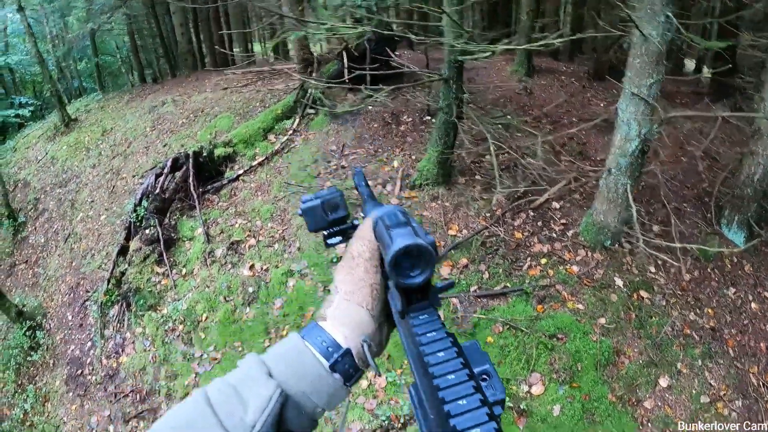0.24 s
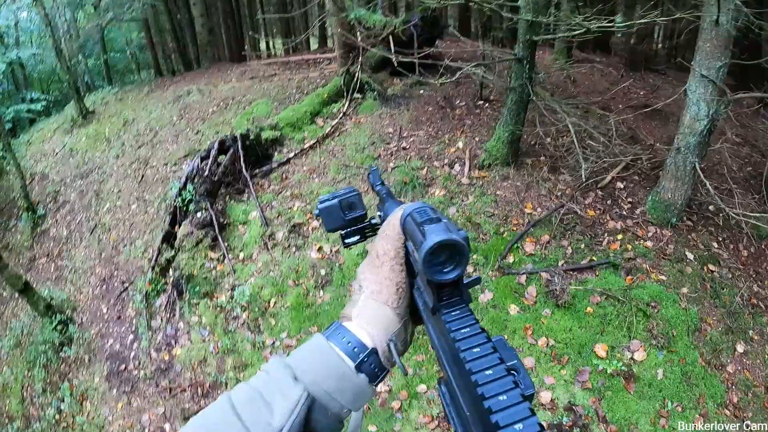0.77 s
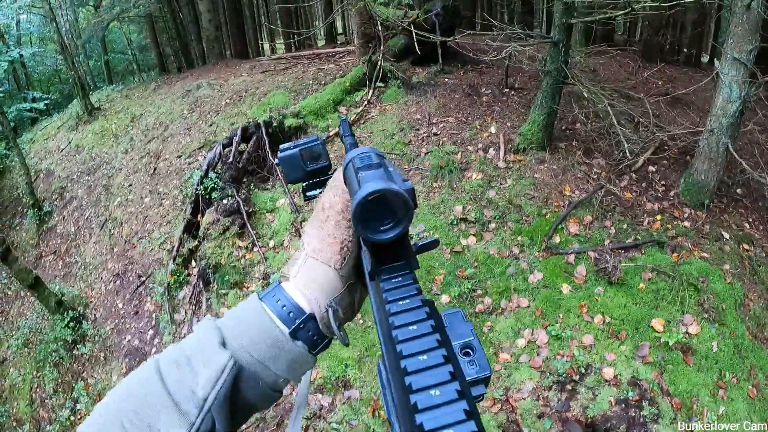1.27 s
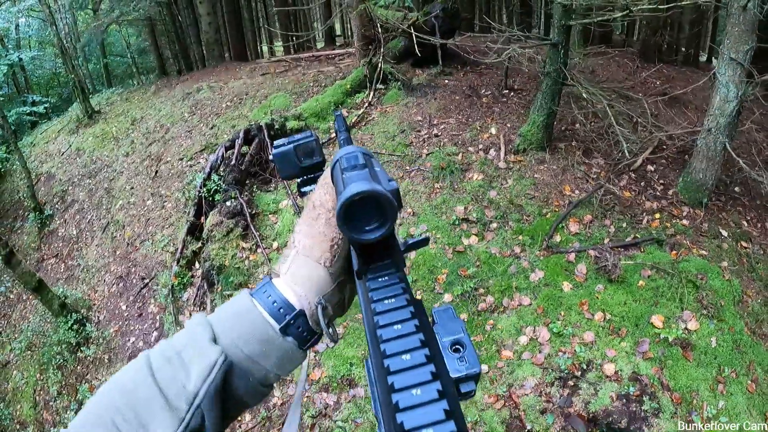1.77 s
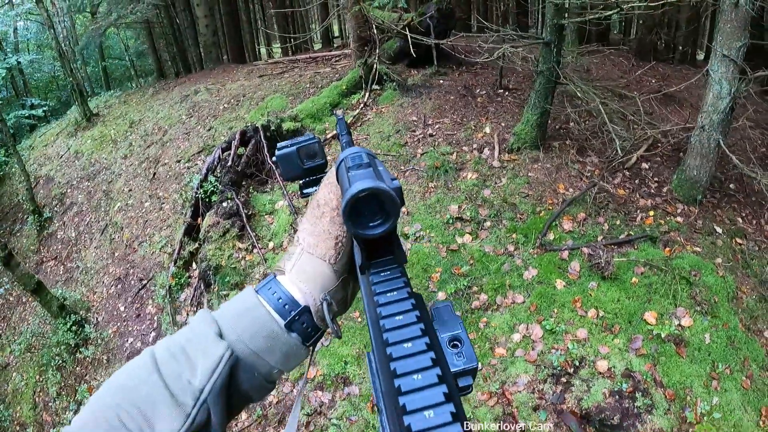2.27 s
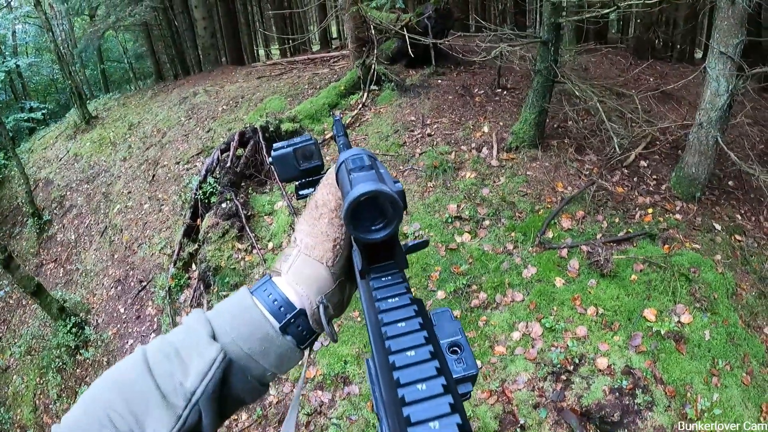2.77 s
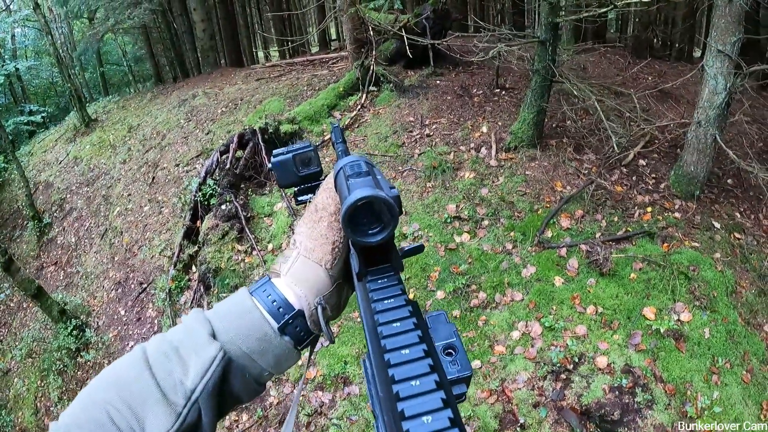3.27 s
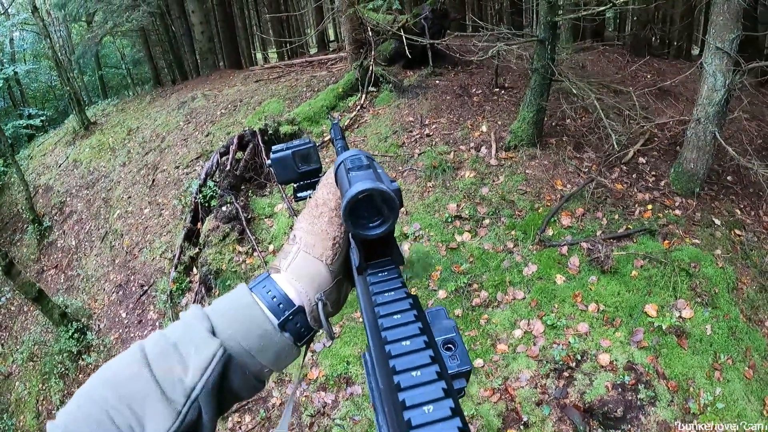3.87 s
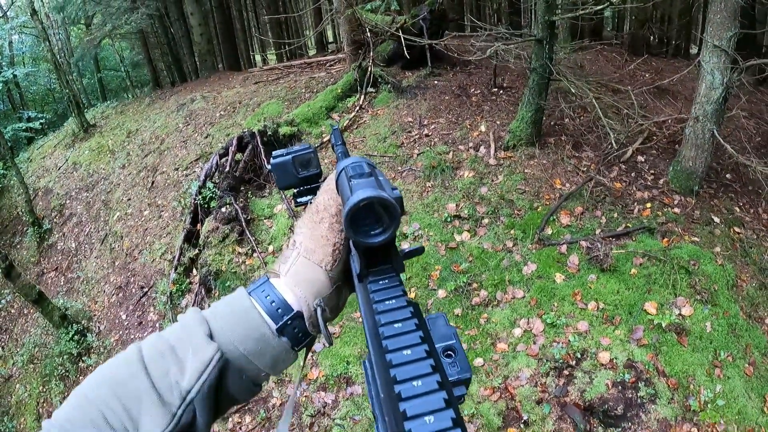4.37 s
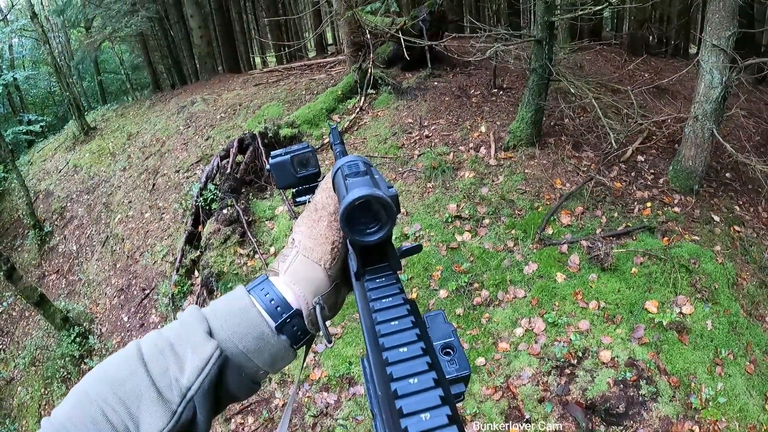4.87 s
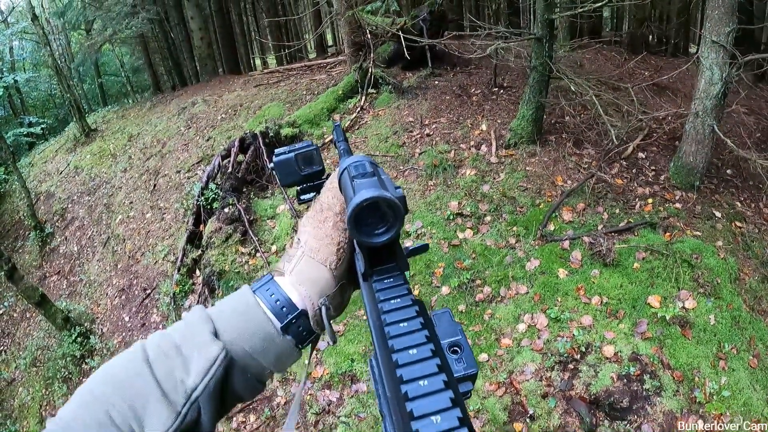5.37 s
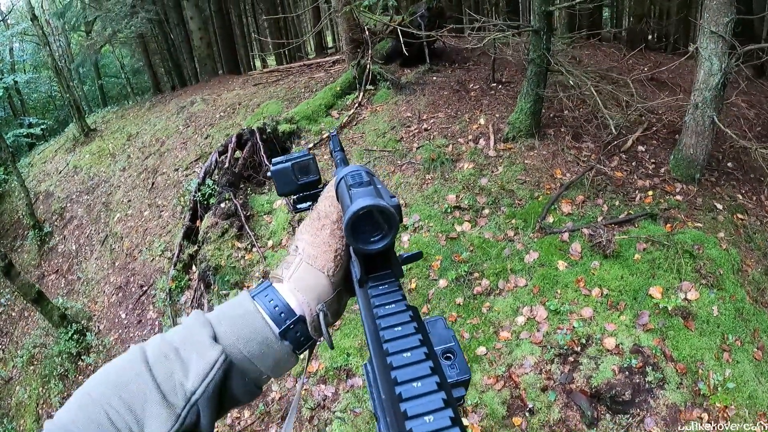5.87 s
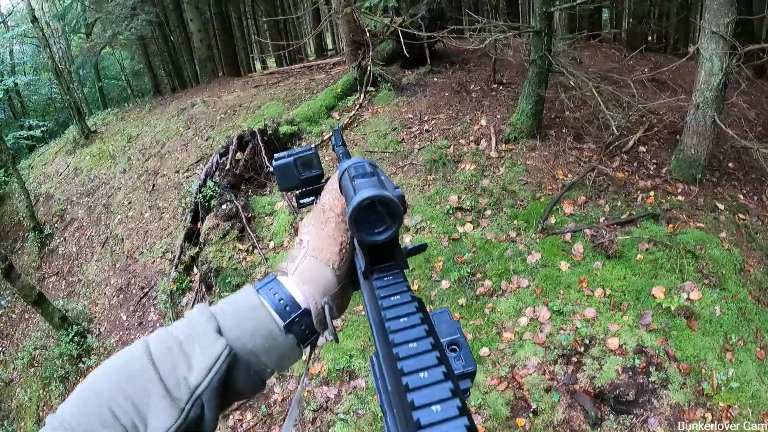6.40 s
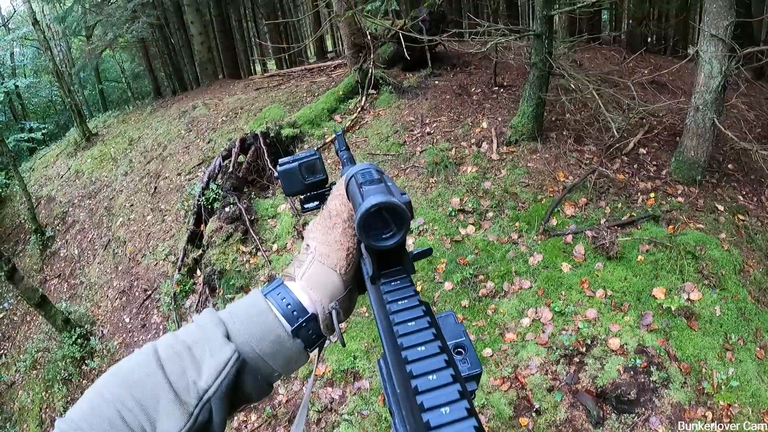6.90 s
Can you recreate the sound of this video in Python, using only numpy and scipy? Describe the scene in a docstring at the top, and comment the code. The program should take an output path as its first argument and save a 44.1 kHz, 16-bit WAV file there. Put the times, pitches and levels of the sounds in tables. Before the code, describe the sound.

A very close, dry and loud gas airsoft rifle in a forest, heard by a camera on the shooter's body. At 0 seconds the bolt slams shut, and at 0.1 a single shot cracks out. Its echo scatters from the trunks and dies within a second, treble first, while cloth rustles, strongest around 1 second, with small handling ticks near 0.4 and 1.6. Automatic fire runs from 1.8 to 3.2, eight shots at about five per second. After a pause with a brief sleeve brush at 3.6, five shots come from 3.8 to 4.6, three from 5.2 to 5.6 and four from 6.2 to 6.8. Each shot is a short falling pop, a bright metallic crack, then a closing slam with rattle and ringing; shots after rests are slightly louder. A far engine's low thuds and a hollow airy drone fade behind; a soft gust rumbles at 7.

```python
"""A gas airsoft rifle fires short automatic bursts in a forest, an arm's length from a body camera.
In each shot shaped noise rings the parts: the action knocks, the bolt cracks against its rear stop and slams home.
A falling tone makes the gas pop at the muzzle, fading sine waves make the frame ring, and trunks echo it all.
Behind lie the thuds of a far idling engine and, from filtered noise, a hollow drone, a rustling sleeve and a breeze."""
import sys
import numpy as np
from scipy import signal
from scipy.fft import rfft, irfft, next_fast_len
from scipy.io import wavfile
from scipy.ndimage import uniform_filter1d

SR = 44100
rng = np.random.default_rng(int(sys.argv[2]) if len(sys.argv) > 2 else 0)


def log_audio(samples):
    """Write samples as a 16-bit WAV file to the path given in sys.argv[1]."""
    # one column per channel
    frames = np.atleast_2d(samples).T
    # limit to full scale, then quantise
    limited = np.clip(frames, -1, 1)
    pcm = np.round(limited * 32767).astype(np.int16)
    wavfile.write(sys.argv[1], SR, pcm)


N = 314874

# shots: (muzzle pop time [s], relative level of the thump through the shooter's body [dB])
SHOTS = [(0.1314, -35), (1.815, -30), (2.0179, -23.5), (2.2039, -26), (2.397, -29), (2.5956, -40),
         (2.7985, -39), (2.997, -33.5), (3.2018, -35), (3.8276, -37.5), (4.0092, -33), (4.206, -28.5),
         (4.397, -34.5), (4.5988, -27.5), (5.2137, -30), (5.4071, -37), (5.6076, -34), (6.207, -30.5),
         (6.4003, -25.5), (6.6003, -30), (6.8064, -31.5)]
# a bolt closing just as the scene opens: (time [s], relative level [dB])
OPENING_BOLT = [(-.001, -1.5)]
# small parts touching around the pop:
# (time after pop [ms], relative level [dB], rise [ms], fall [ms], resonance [Hz], width [Hz])
FIRING_CONTACTS = [(-21.5, -27, 0.28, 1.1, 6300, 1600), (-15.5, -16.5, 1.4, 7.2, 718, 250),
                   (-14.5, -19, 3.35, 4.7, 1100, 370), (-10.5, -14.5, 0.63, 1.8, 4700, 420),
                   (-7.5, -25, 7.8, 9.4, 2090, 270), (-3, -19, 2.4, 1.2, 6300, 1500),
                   (14.5, -28.5, 0.59, 5.9, 690, 380), (27, -28, 0.67, 5.3, 1380, 210)]
# small parts touching as the bolt seats:
# (time after it is home [ms], relative level [dB], rise [ms], fall [ms], resonance [Hz], width [Hz])
SEATING_CONTACTS = [(-11, -28.5, 1.8, 3.7, 1050, 320), (-7.5, -30, 6.5, 2.9, 3300, 350),
                    (-1, -12.5, 1.4, 3.2, 1021, 185), (5, -38.5, 0.75, 2.4, 576, 100),
                    (17, -37.5, 7.6, 25, 1010, 300), (30, -31, 1.3, 6.8, 1150, 450),
                    (40, -33.5, 0.87, 2.5, 3300, 700)]
# the bolt sliding and chattering in its rails: (time after pop [ms], relative level [dB], rise [ms], fall [ms])
SLIDES = [(-9, -19, 9.76, 18.5), (7.5, -21.5, 2.1, 6.5), (14, -17, 0.57, 9.7), (47.5, -40, 5.6, 2.8)]
# resonances of the rails: (frequency [Hz], width [Hz], relative level [dB])
RAIL_MODES = [(130, 230, -1.5), (730, 1600, -11.5), (1290, 440, 1.5), (2316, 390, 3), (3280, 440, -8.5),
              (3980, 1440, -3.5), (5430, 610, -6), (6850, 360, -7)]
# resonances of the bolt hitting its rear stop: (frequency [Hz], width [Hz], relative level [dB])
REAR_STOP_MODES = [(158, 140, -4.5), (614, 140, 1.5), (1307, 67, -8), (2190, 150, 0), (2600, 160, 0),
                   (3700, 160, 2), (4360, 203, 1.5), (5060, 300, -4), (5560, 180, -30), (5750, 280, -4),
                   (6950, 400, -2.5), (6740, 230, -19.5), (9500, 4400, -19.5)]
# resonances of the bolt hitting the breech: (frequency [Hz], width [Hz], relative level [dB])
BREECH_MODES = [(150, 260, -17.5), (1456, 50, 5), (2000, 140, 1.5), (2130, 490, 3), (3110, 190, 3.5),
                (3780, 360, 0.5), (4340, 260, -0.5), (6020, 370, -3), (6880, 130, -14.5), (7140, 450, -2),
                (9500, 2100, -15.5)]
# ringing of frame and barrel when the bolt hits either end: (frequency [Hz], width [Hz], relative level [dB])
FRAME_MODES = [(689, 22.5, -10.5), (932.3, 27.2, 2), (1150, 26, -12), (1360, 54, -10.5), (1860, 19, -14),
               (2092, 31, -7.5), (2414, 27, -9.5), (3250, 32, -13), (3670, 30.5, -6.5), (3890, 31, -13.5),
               (4600, 26, -24.5), (4700, 26, -20.5), (5160, 20, -17.5), (5300, 38, -15), (5480, 16, -16.5),
               (7000, 45, -13), (7500, 93, -14)]
# tone of the echo from the trunks: (frequency [Hz], relative level [dB])
FOREST_TONE = [(100, -10), (300, -16.5), (900, -10), (2000, -4.5), (2850, -10.5), (3400, -1.5), (5000, 1.5),
               (6800, 3), (9000, 5.5), (15000, 2.5)]
# the far engine sinks away and comes back a little: (time [s], level [dB])
ENGINE_LEVEL = [(0, -39.5), (1.3, -43), (2.2, -45.5), (3.5, -50.5), (4.75, -59), (6, -58.5), (7.14, -47.5)]
# resonances of the engine's exhaust: (frequency [Hz], width [Hz], relative level [dB])
EXHAUST_MODES = [(29.1, 6, 2), (46, 8, -1.5), (61, 4.7, -8), (90, 16, -9), (150.5, 100, -24.5)]
# loudness of the hollow drone: (time [s], level [dB])
DRONE_LEVEL = [(0.0, -46), (0.28, -46), (1.69, -46.5), (2.24, -44.5), (7.14, -59)]
# resonances of the drone: (frequency [Hz], width [Hz], relative level [dB])
DRONE_MODES = [(319.4, 39.5, 2), (515, 30, 3), (670.4, 25.3, 5.5), (849, 52, 3), (1170, 170, -12),
               (1700, 110, -5.5), (2260, 550, -20.5), (4500, 2000, -28)]
# the sleeve rustles as the rifle is raised and dies away as the aim settles: (time [s], level [dB])
SLEEVE_LEVEL = [(0, -60), (.45, -55), (.65, -47.5), (1.0, -45.5), (1.35, -51.5), (1.7, -56.5), (3.3, -66),
                (3.9, -74.5), (7.14, -92)]
# tone of the rubbing cloth: (frequency [Hz], relative level [dB])
CLOTH_TONE = [(300, 4.5), (1000, 10), (2000, 2), (3000, -2.5), (6000, -6.5), (7300, -11), (8200, -6),
              (11000, -7), (12200, -9), (15000, -9)]
# one short brush of the sleeve between bursts: (time [s], half length [s], level [dB])
SLEEVE_BRUSH = (3.63, 0.07, -55.5)
# one gust of the breeze: (time [s], half length [s], level [dB])
BREEZE_GUST = (7.0, 0.114, -49.5)
# thumps carried by the shooter's body: (frequency [Hz], width [Hz], relative level [dB])
BODY_MODES = [(30, 16, 0), (54.5, 18, 3), (99.5, 45, -2.5)]
# light handling ticks on the rifle: (time [s], level [dB])
HANDLING_TICKS = [(.39, -58), (.488, -52.5), (1.63, -50)]
# response of the camera's sound ports: (frequency [Hz], level [dB])
PORT_TONE = [(20, 1), (7400, -0.5), (8000, -6), (10000, -6.5), (10900, -13.5), (12200, -4), (13400, -13),
             (15500, -13)]
# difference between the two ports: (frequency [Hz], level [dB])
PORT_DIFFERENCE = [(150, -56), (700, -51.5), (1400, -45), (2500, -54), (3800, -49.5), (4800, -27),
                   (6900, -27.5), (8200, -20.5), (10000, -13), (12500, -0.5), (15500, 3)]

# each blow is computed in a short block, on a clock that is zero at the crest of its swell
BLOCK_SIZE = 8192
CREST = BLOCK_SIZE // 3
BLOCK_MS = (np.arange(BLOCK_SIZE) - CREST) * 1000 / SR
# room for one long filter over the whole scene [samples]
FFT_SIZE = next_fast_len(N + 2 * SR)

# every shot chills the gas; a rest restores its pressure, so the next shot is louder and throws the bolt further
# time constant of recovery [s], and what full recovery would add to level [dB] and stroke time [s]
RECOVERY_S, RESTED_DB, RESTED_STROKE_S = 2, 5, .0034
# a shot in mid-burst: time from pop until the bolt is home [s], relative levels of its blows and their scatter [dB]
STROKE_S = 0.06
POP_DB, STOP_DB, HOME_DB, UNEVEN_DB = -.5, 0.33, -0.7, 0.12


def undb(db):
    """Turn decibels into a gain."""
    return 10 ** (np.asarray(db) / 20)


def unit(x):
    """Scale to an average strength (rms) of 1 along time."""
    return x / np.sqrt(np.mean(x ** 2, axis=-1, keepdims=True))


def fader(rows):
    """Gain over time, drawn through (time [s], level [dB]) rows."""
    return undb(np.interp(np.arange(N) / SR, *np.transpose(rows)))


def surge(at, half_s, db):
    """Gain over time of one smooth rise and fall."""
    return undb(db) * np.exp(-((np.arange(N) / SR - at) / half_s) ** 2)


def walk(rate):
    """Random levels, each held for 1 / rate seconds, then smoothed and scaled to rms 1."""
    hold = int(SR / rate)
    steps = np.repeat(rng.standard_normal(N // hold + 1), hold)
    return unit(uniform_filter1d(steps, hold)[:N])


def bins(size):
    """Frequencies [Hz] of a spectrum of this size, kept above zero."""
    return np.maximum(np.arange(size // 2 + 1) * SR / size, 1)


def slope(points, size):
    """Gain over frequency, drawn through (frequency [Hz], level [dB]) points."""
    hz, db = np.transpose(points)
    return undb(np.interp(np.log(bins(size)), np.log(hz), db))


def humps(modes, size):
    """Gain over frequency of steep-sided resonances whose powers add."""
    f = bins(size)
    power = 1e-12
    for hz, width, db in modes:
        off_pitch = (f - hz * hz / f) / width / 2
        power = power + undb(2 * db) / (1 + off_pitch ** 2) ** 2
    return np.sqrt(power)


def causal(x, gain):
    """Filter with this gain so that the ringing comes only after its cause."""
    size = 2 * (len(gain) - 1)
    # folding the cepstrum forward in time gives the minimum-phase filter
    cepstrum = irfft(np.log(gain), size)
    cepstrum[1:size // 2] *= 2
    cepstrum[size // 2 + 1:] = 0
    response = np.exp(rfft(cepstrum))
    return irfft(rfft(x, size) * response, size)[..., :x.shape[-1]]


def blows(times, db, rise_ms, fall_ms, modes, alike=0.25, chatter_db=3):
    """At each time a swell of tiny, uneven impacts rings the modes; part of the pattern repeats in every blow."""
    swell = np.exp(np.minimum(BLOCK_MS / rise_ms, -BLOCK_MS / fall_ms))
    # silence the start of the swell
    swell = swell * np.clip(BLOCK_MS / rise_ms + 4, 0, 1)
    chance = rng.standard_normal((len(times) + 1, BLOCK_SIZE))
    impacts = np.sqrt(alike) * chance[0] + np.sqrt(1 - alike) * chance[1:]
    # the parts touch and lift off: a new random level every 32 samples, about 0.7 ms
    grip = np.repeat(rng.standard_normal((len(times), BLOCK_SIZE // 32)), 32, axis=1)
    impacts = impacts * undb(chatter_db * grip)
    ringing = causal(impacts * swell, humps(modes, BLOCK_SIZE))
    sounds = unit(ringing) * np.sqrt(np.mean(swell ** 2))
    # one spare second on either side holds blows that overlap the edges
    out = np.zeros(N + 2 * SR)
    starts = (SR * (times + 1)).astype(int) - CREST
    for start, sound, gain in zip(starts, sounds, undb(db)):
        out[start:start + BLOCK_SIZE] += gain * sound
    return out[SR:SR + N]


def contacts(times, force_db, table, wander=.035, uneven_db=0.63):
    """Small parts meet, each with one resonance; the further from the main event, the looser their timing."""
    out = 0
    for ms, db, rise, fall, hz, width in table:
        late, hard = rng.standard_normal((len(times), 2)).T
        at = times + ms * (1 + wander * late) * 1e-3
        level_db = force_db + db + uneven_db * hard
        out = out + blows(at, level_db, rise, fall, [(hz, width, 0)], alike=0.6, chatter_db=2)
    return out


def frame(times, force_db, uneven_db=2, detune=0.0036):
    """Narrow modes of frame and barrel ring on; each blow shares its force among them a little differently."""
    t = np.arange(BLOCK_SIZE) / SR
    hz, width, db = np.transpose(FRAME_MODES)[:, :, None]
    out = np.zeros(N + SR)
    for at, force in zip(times, force_db):
        share, bend, phase = rng.standard_normal((3, len(FRAME_MODES), 1))
        pitch = hz * (1 + detune * bend)
        # the wider a mode, the sooner it dies
        modes = np.exp(-np.pi * width * t) * np.sin(2 * np.pi * (pitch * t + phase))
        gains = undb(force + db - 19 + uneven_db * share)
        start = int(max(at, 0) * SR)
        out[start:start + BLOCK_SIZE] += np.sum(gains * modes, axis=0)
    return out[:N]


def bolt_home(home, home_db, reach_s=.004):
    """The bolt slides forward in its rails, slams into the breech and makes small parts and frame ring."""
    sound = contacts(home, home_db, SEATING_CONTACTS)
    sound += blows(home - reach_s, home_db - 31, rise_ms=11, fall_ms=31, modes=RAIL_MODES, chatter_db=0)
    sound += blows(home - .0005, home_db - 16, rise_ms=2.6, fall_ms=4.96, modes=BREECH_MODES,
                   alike=0.65, chatter_db=2.5)
    return sound + frame(home, home_db - 0.8)


def forest(x, echo_db=-22.5, build_s=0.054, low_t60_s=0.99, high_t60_s=0.42, split_hz=2600, patchy_db=4):
    """Trunks near and far scatter the shots back; the treble dies first."""
    t = np.arange(SR) / SR
    # the echo is patchy: a new random level every 100 samples
    patches = np.repeat(rng.standard_normal(SR // 100), 100)
    scatter = rng.standard_normal(SR) * undb(patchy_db * patches)
    scatter = causal(scatter, slope(FOREST_TONE, SR))
    low = signal.sosfilt(signal.butter(2, split_hz, fs=SR, output="sos"), scatter)
    high = signal.sosfilt(signal.butter(2, split_hz, "high", fs=SR, output="sos"), scatter)
    # each band falls by 60 dB in its t60; the minus sign joins the bands without a notch
    tail = low * undb(-60 * t / low_t60_s) - high * undb(-60 * t / high_t60_s)
    tail = tail * (1 - np.exp(-t / build_s))
    return undb(echo_db) * signal.fftconvolve(x, unit(tail) / np.sqrt(SR))[:N]


def engine(firing_hz=19.72, uneven_s=0.0023, scatter_db=4.5, rumble=0.97):
    """A far engine idles: unevenly timed and weighted thuds in a low rumble, coloured by the exhaust."""
    late, hard = rng.standard_normal((200, 2)).T
    at = (SR * (np.arange(len(late)) / firing_hz + uneven_s * late)).astype(int)
    heard = (at >= 0) & (at < N)
    thuds = np.bincount(at[heard], undb(scatter_db * hard[heard]), N)
    drive = unit(thuds) + rumble * rng.standard_normal(N)
    return unit(causal(drive, humps(EXHAUST_MODES, FFT_SIZE))) * fader(ENGINE_LEVEL)


def drone():
    """A faint, airy, hollow drone: noise through pipe-like resonances."""
    return unit(causal(rng.standard_normal(N), humps(DRONE_MODES, FFT_SIZE))) * fader(DRONE_LEVEL)


def sleeve(grain_db=3, tugs_per_s=16, tug_db=2.5):
    """Fibres catch and slip, making grainy noise, as the arm moves in small tugs."""
    grains = rng.standard_normal(N) * undb(grain_db * rng.standard_normal(N))
    tugs = undb(tug_db * walk(tugs_per_s))
    motion = fader(SLEEVE_LEVEL) * tugs + surge(*SLEEVE_BRUSH)
    return unit(causal(grains, slope(CLOTH_TONE, FFT_SIZE))) * motion


def breeze(steady_db=-59.5):
    """Moving air rumbles softly on the microphone, with one gust."""
    modes = [(55, 36, -7.5), (96, 33, 3.5)]  # (frequency [Hz], width [Hz], relative level [dB])
    rumble = unit(causal(rng.standard_normal(N), humps(modes, FFT_SIZE)))
    return rumble * (undb(steady_db) + surge(*BREEZE_GUST))


def firing_action(fired, pop_db):
    """Small parts knock around the pop while the bolt slides and chatters in its rails."""
    sound = contacts(fired, pop_db, FIRING_CONTACTS)
    for ms, db, rise, fall in SLIDES:
        sound += blows(fired + ms * 1e-3, pop_db + db, rise, fall, RAIL_MODES, chatter_db=2.5)
    return sound


def body_thumps(fired, home, recoil_db):
    """Both ends of the bolt's stroke shake the camera through the shooter's body."""
    recoil = blows(fired - .002, recoil_db + 3, rise_ms=4, fall_ms=7, modes=BODY_MODES, chatter_db=0)
    closing = blows(home - .005, recoil_db + 1, rise_ms=2.2, fall_ms=7, modes=BODY_MODES, chatter_db=3.5)
    return recoil + closing


def muzzle(times, db, lead_s=0.0013, start_hz=630, end_hz=120, glide_s=0.0023, crest_s=0.0015):
    """Gas leaves the barrel: a short pop whose pitch falls with the pressure."""
    t = np.arange(BLOCK_SIZE) / SR
    hz = end_hz + (start_hz - end_hz) * np.exp(-t / glide_s)
    swell = t / crest_s * np.exp(1 - t / crest_s)
    pop = -np.sin(2 * np.pi * np.cumsum(hz) / SR) * swell
    kicks = np.zeros(N)
    kicks[((times - lead_s) * SR).astype(int)] = undb(db - 3)
    return signal.fftconvolve(kicks, pop)[:N]


def rear_stop(fired, stop_db, travel_s=.0113):
    """The bolt flies back, cracks against its stop and makes the frame ring."""
    hit = fired + travel_s
    crack = blows(hit, stop_db - 9, rise_ms=1, fall_ms=1.58, modes=REAR_STOP_MODES, alike=0.28, chatter_db=1.5)
    return crack + frame(hit, stop_db - 2.5)


def handling():
    """Fittings tick as the grip shifts."""
    times, db = np.transpose(HANDLING_TICKS)
    modes = [(3000, 900, -5), (4300, 700, -1), (6450, 1000, -6)]  # (frequency [Hz], width [Hz], level [dB])
    return blows(times, db, rise_ms=2.4, fall_ms=12, modes=modes)


def cycle():
    """Times of pop and closing, and levels of pop, rear stop, closing and recoil, for every shot."""
    fired, recoil_db = np.transpose(SHOTS)
    gaps = np.diff(fired)
    # only waiting beyond the usual gap counts as rest
    rest = np.append(0, np.maximum(gaps - np.median(gaps), 0))
    pressure = 1 - np.exp(-rest / RECOVERY_S)
    pop, stop, closing = UNEVEN_DB * rng.standard_normal((len(fired), 3)).T
    home = fired + STROKE_S + RESTED_STROKE_S * pressure
    # gas drives the pop and the backward stroke; the spring alone closes the bolt
    pop_db = POP_DB + RESTED_DB * pressure + pop
    stop_db = STOP_DB + RESTED_DB * pressure + stop
    return fired, home, pop_db, stop_db, HOME_DB + closing, recoil_db


def rifle():
    """One cycle per shot: the action fires, the bolt flies back, hits its stop and runs home."""
    fired, home, pop_db, stop_db, home_db, recoil_db = cycle()
    closings, closings_db = np.vstack([OPENING_BOLT, np.column_stack([home, home_db])]).T
    bolt = bolt_home(closings, closings_db) + rear_stop(fired, stop_db)
    shots = firing_action(fired, pop_db) + muzzle(fired, pop_db)
    return bolt + shots + body_thumps(fired, home, recoil_db)


def scene():
    """Rifle, forest echo and background, reaching both ports nearly alike."""
    shots = rifle()
    # the aim wanders, so neighbouring shots meet different trunks: three echoes take turns
    aim = np.searchsorted(np.transpose(SHOTS)[0], np.arange(N) / SR + .08) % 3
    echo = sum(forest(shots * (aim == k)) for k in range(3))
    mid = shots + echo + engine() + drone() + sleeve() + handling() + breeze()
    # fresh random draws, opposite in left and right, widen the background
    side = undb(-4) * engine() + undb(-2) * drone() + undb(-4) * sleeve()
    return np.array([mid + side, mid - side])


def record(dry, turn=1.6, glint_db=-6, glint_s=.012, ceiling=.88, top_hz=15700):
    """The ports dull the top and shift its phase between left and right; the loudest peaks are rounded."""
    spectrum = rfft(causal(dry, slope(PORT_TONE, FFT_SIZE)), FFT_SIZE)
    # reflections off arm and rifle reach the two ports differently
    glints = rng.standard_normal(SR) * np.exp(-np.arange(SR) / SR / glint_s)
    glints = unit(glints) / np.sqrt(SR)
    # turn is a phase shift [radians]
    shift = np.exp(1j * turn) + undb(glint_db) * rfft(glints, FFT_SIZE)
    difference = slope(PORT_DIFFERENCE, FFT_SIZE) * shift
    left_right = np.array([[1], [-1]])
    heard = irfft(spectrum * (1 + difference * left_right), FFT_SIZE)[:, :N]
    rounded = heard / (1 + (heard / ceiling) ** 6) ** (1 / 6)
    # nothing much is left above top_hz
    return signal.sosfilt(signal.ellip(10, .2, 80, top_hz, fs=SR, output="sos"), rounded)


dry = scene()
out = record(dry)
log_audio(out)
```